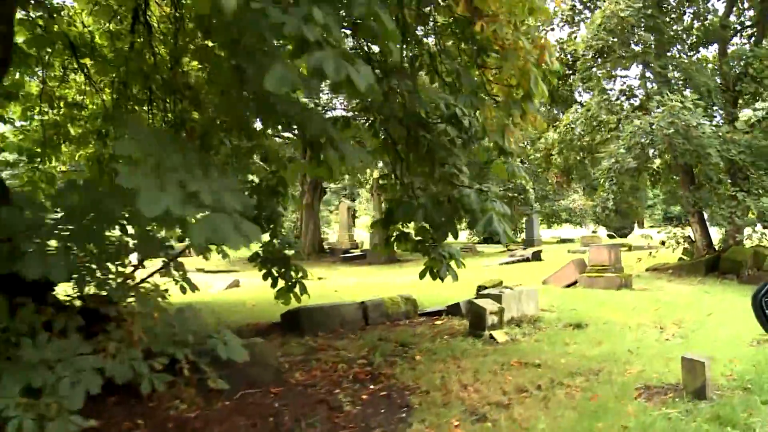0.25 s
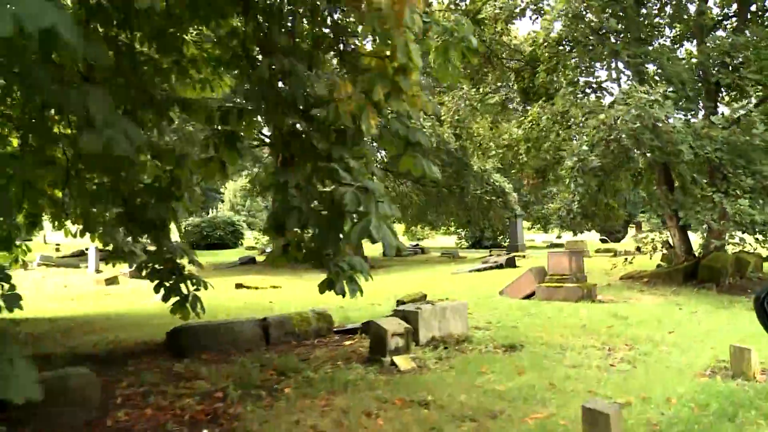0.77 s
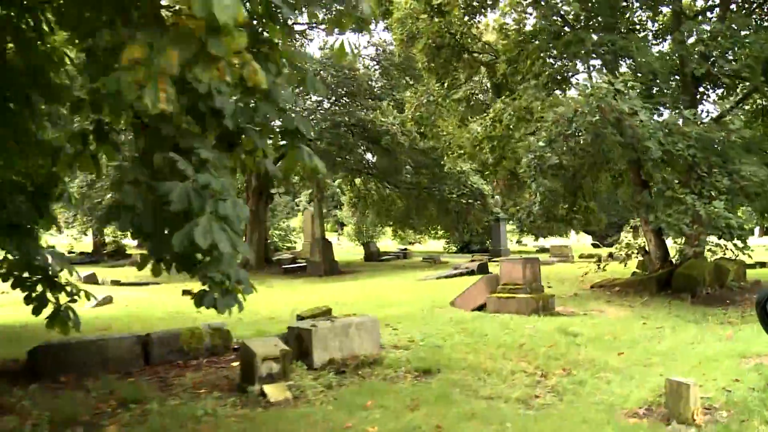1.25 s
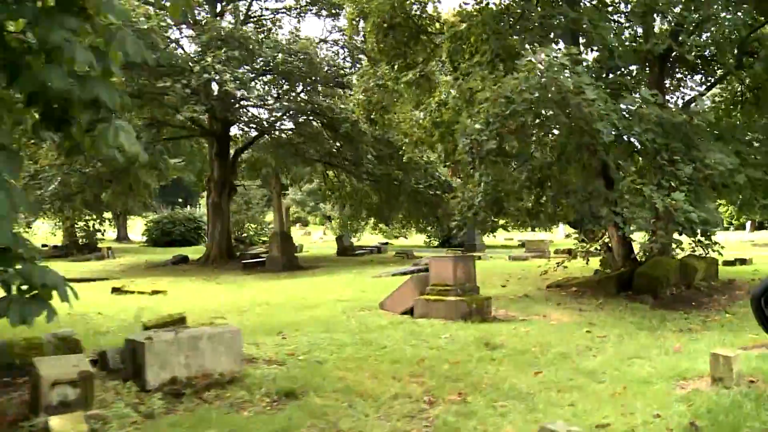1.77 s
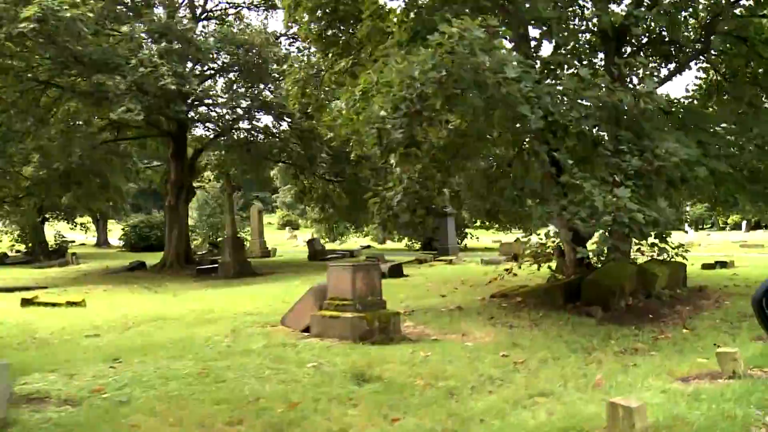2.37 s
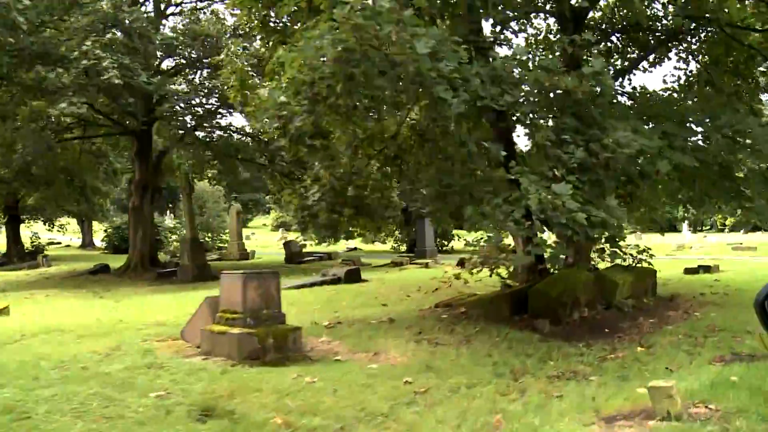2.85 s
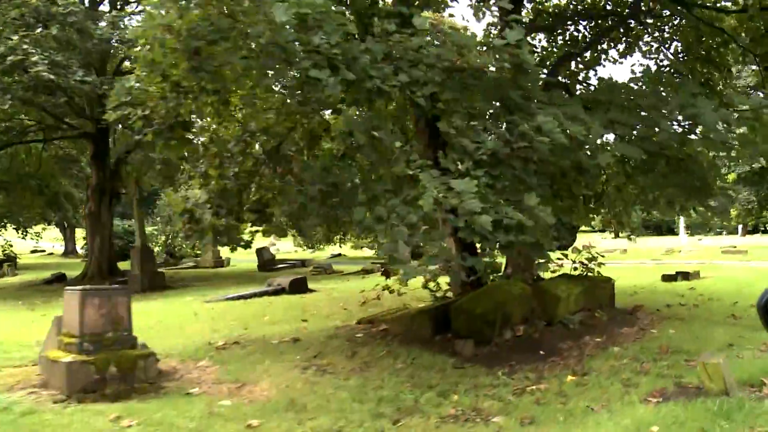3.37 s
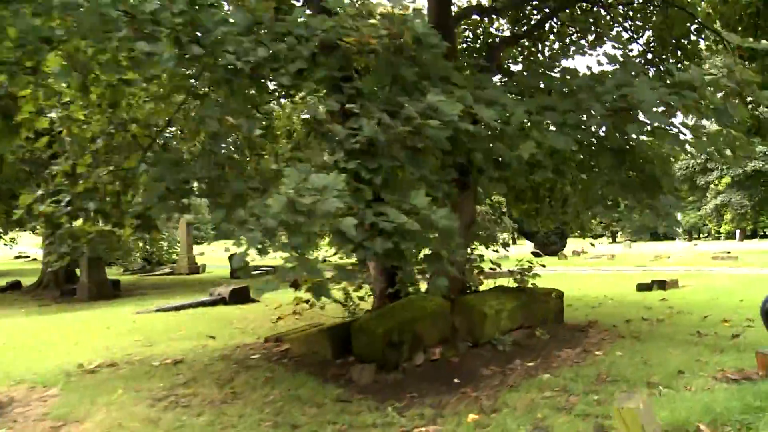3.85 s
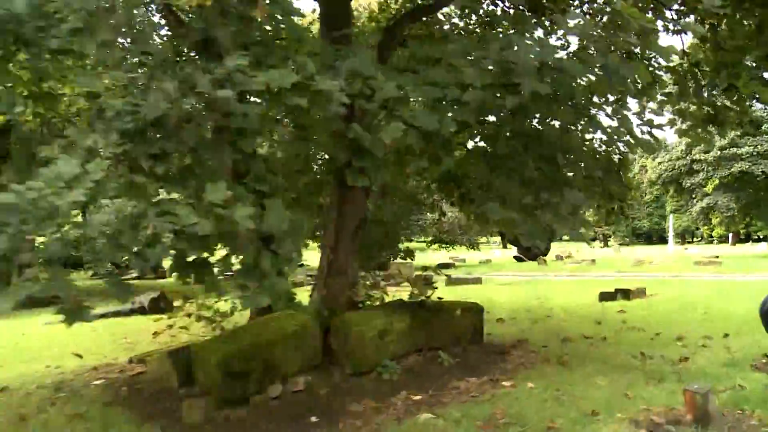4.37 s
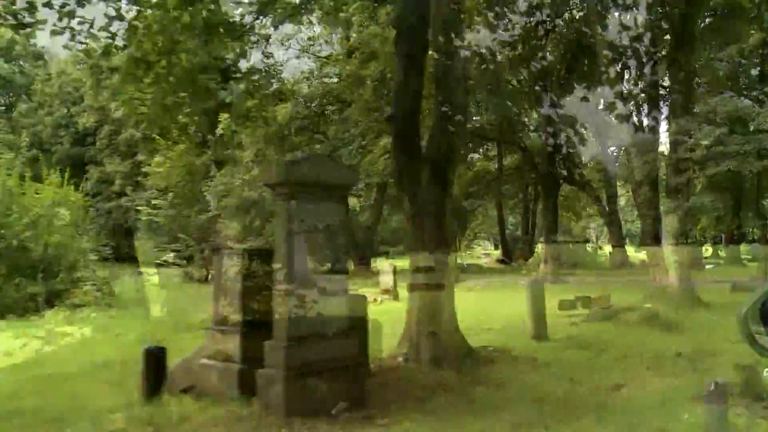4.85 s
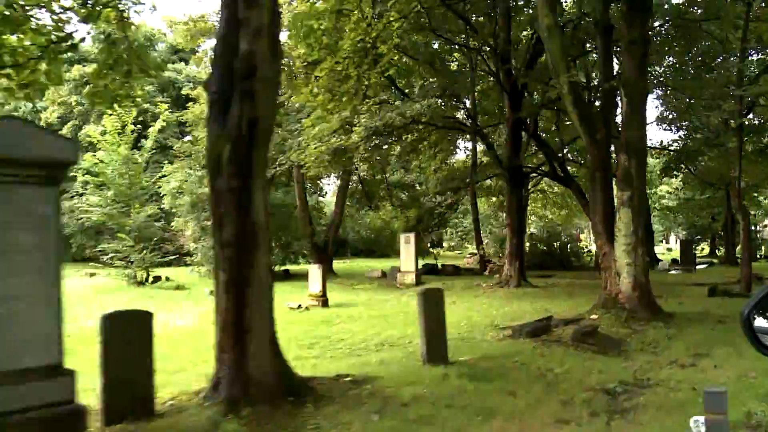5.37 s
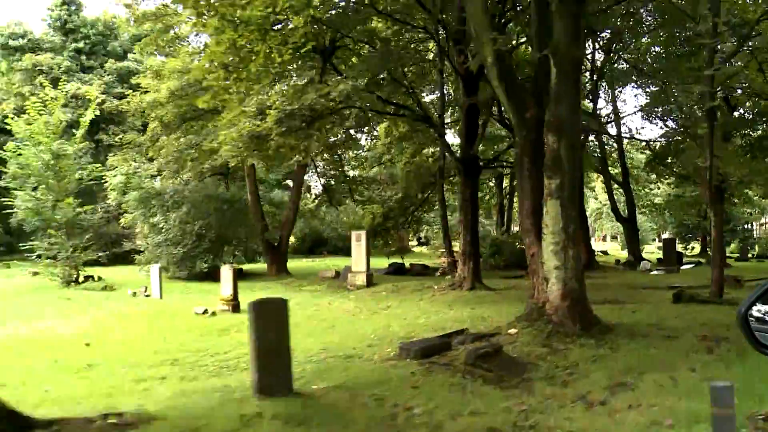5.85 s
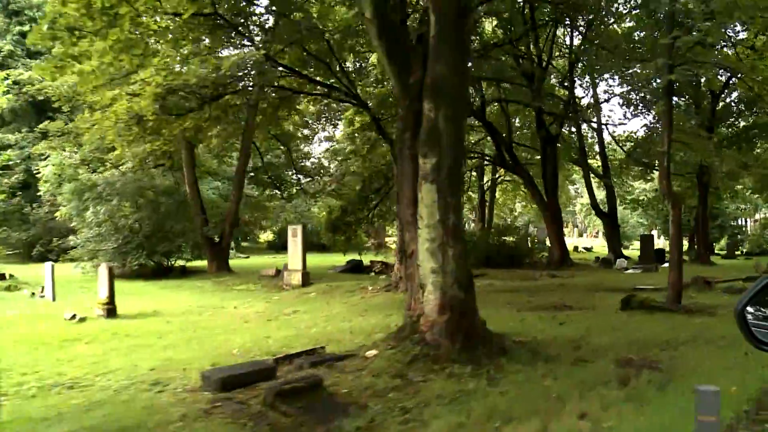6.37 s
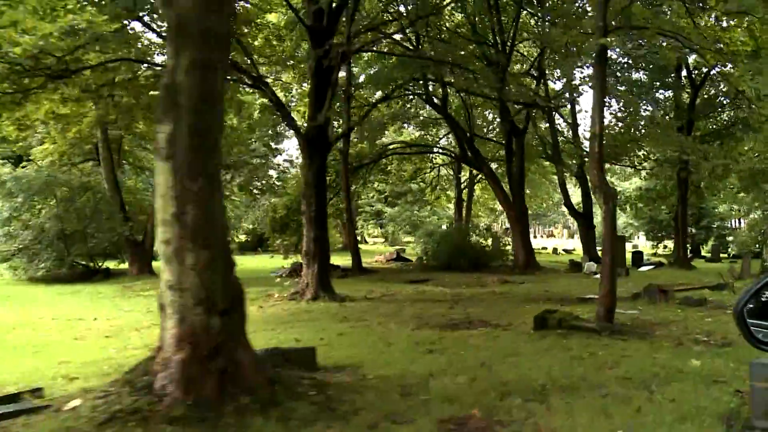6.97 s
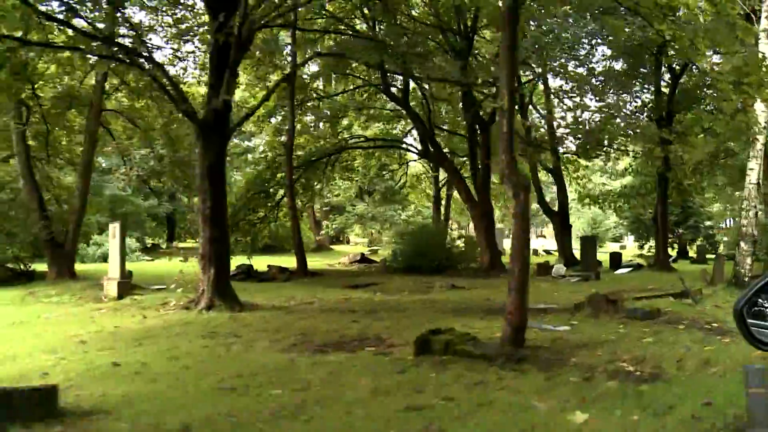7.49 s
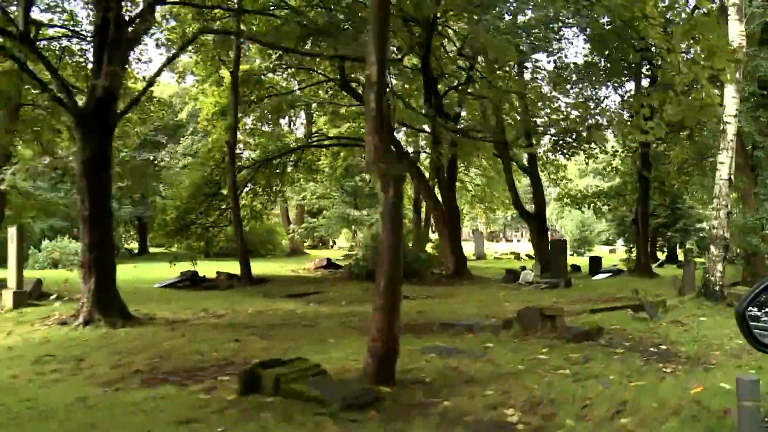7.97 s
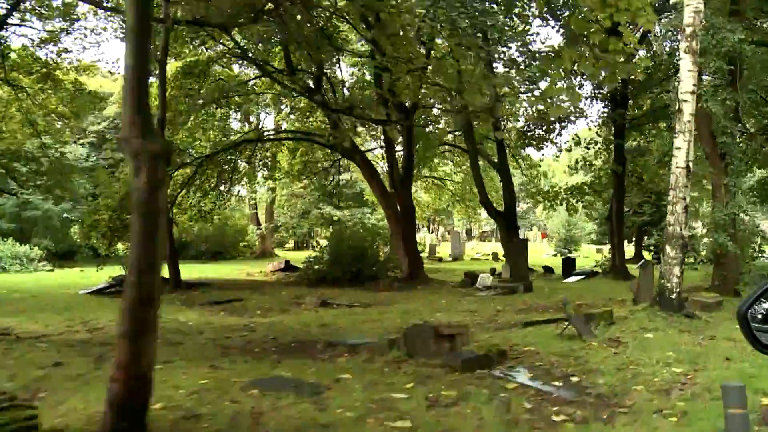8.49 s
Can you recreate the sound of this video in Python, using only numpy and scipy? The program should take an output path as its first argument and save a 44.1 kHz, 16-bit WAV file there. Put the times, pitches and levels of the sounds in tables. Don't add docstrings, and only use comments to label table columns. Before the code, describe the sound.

Low idling engine rumble from a slow car, soft leaf and grit hiss under the tyres, a click midway, then gustier wind buffeting.

```python
import sys
import numpy as np
from scipy import signal
from scipy.fft import rfft, irfft, next_fast_len
from scipy.io import wavfile
from scipy.ndimage import uniform_filter1d

SR = 44100
rng = np.random.default_rng(int(sys.argv[2]) if len(sys.argv) > 2 else 0)


def to_wav(sig):
    pcm = np.clip(np.atleast_2d(sig), -1, 1) * 32767
    pcm = np.round(pcm).astype(np.int16)
    wavfile.write(sys.argv[1], SR, pcm.T)


def makeup_ratio(level_db):
    decades = np.asarray(level_db, float) / 20
    return 10 ** decades


N = 384993
CUT_S = 4.8286


def evened(x):
    return x / np.sqrt(np.mean(x ** 2) + 1e-20)


def columns(table):
    s, *values = np.transpose(table)
    return [np.interp(np.arange(N) / SR, s, v) for v in values]


def noise(points, rings=(), band=None):
    size = next_fast_len(N)
    hz = np.fft.rfftfreq(size, 1 / SR)
    point_hz, point_db = np.transpose(points)
    colour_db = np.interp(np.log(hz + 1), np.log(point_hz + 1), point_db, -120, -120)
    for mid_hz, width_hz, peak_db in rings:
        colour_db += peak_db / (1 + ((hz - mid_hz) / (width_hz / 2)) ** 2)
    spectrum = rfft(rng.standard_normal(size)) * makeup_ratio(colour_db)
    inside = spectrum
    if band is not None:
        inside = spectrum * ((hz > band[0]) & (hz < band[1]))
    return irfft(spectrum, size)[:N] / np.std(irfft(inside, size))


def steadied(x, span_s, share):
    size = max(round(span_s * SR), 1)
    power = uniform_filter1d(uniform_filter1d(x ** 2, size), size)
    return x / evened(np.sqrt(abs(power) + 1e-6)) ** share


def wander(top_hz):
    points = 4096
    step = N / (points - 1)
    hz = np.fft.rfftfreq(points, step / SR)
    slow = irfft(rfft(rng.standard_normal(points)) / (1 + (hz / top_hz) ** 4))
    return np.interp(np.arange(N) / step, np.arange(points), evened(slow))


def bumps(times, heights, half_s):
    out = np.zeros(N)
    for s, height, half in zip(times, heights, half_s * np.ones(len(times))):
        first = max(round((s - 3 * half) * SR), 0)
        at = np.arange(first, min(round((s + 3 * half) * SR), N))
        out[at] += height * np.exp(-((at / SR - s) / half) ** 2)
    return out


def second_pass():
    return np.arange(N) > CUT_S * SR


def law(control_db, base_db, slope, late_db):
    return base_db + slope * control_db + late_db * second_pass()


def patchy(x):
    z = signal.stft(x, nperseg=512)[2]
    field = rng.standard_normal(z.T.shape)
    field = uniform_filter1d(field, size=6, axis=0)
    field = evened(uniform_filter1d(field, size=9, axis=1))
    patch_db = 1
    return signal.istft(z * makeup_ratio(patch_db * field.T), nperseg=512)[1][:N]


# (pitch [Hz], waver [Hz], first-pass level [dB], second-pass level [dB])
HUM_TONES = [(96.8, 1.55, -45.5, -47), (101.8, 1.15, -44.5, -53.5), (128.2, 1.467, -48.5, -53.5),
             (154.4, 1.187, -52, -57), (207.2, 1.53, -50.5, -56.5), (308.3, 1.89, -57, -56)]


def hum():
    out = np.zeros(N)
    late = second_pass()
    for hz, waver_hz, early_db, late_db in HUM_TONES:
        turns = np.cumsum(hz + waver_hz * wander(top_hz=2.38)) / SR
        level_db = np.where(late, late_db, early_db) + 2.0 * wander(top_hz=1.47)
        out += makeup_ratio(level_db) * np.sin(2 * np.pi * turns)
    return np.sqrt(2) * out


# (time [s], level [dB])
GUSTS = [(0, -1), (.95, 0.5), (1.5, 0), (2.3, 1), (2.85, 4.5), (3.25, 2), (4.1, 0), (4.82, 1.5), (4.84, 1),
         (5.3, 0.5), (6.1, 1), (6.9, 1.5), (7.64, 2), (7.72, 10.5), (7.95, 8.5), (8.4, 2.5), (8.73, 5.5)]


def gusts():
    return columns(GUSTS)[0]


# (frequency [Hz], level [dB per Hz])
HEAVE_COLOUR = [(3, -43), (7, -6.5), (13, -1), (22, 1), (30, -5.5), (40, -16)]
BUFFET_COLOUR = [(22, -25), (33, 1), (45, 1), (70, -3), (105, -5), (140, -20.5), (180, -59)]
ROAR_COLOUR = [(90, -28), (125, 0), (170, -1), (250, -3.5), (350, -8), (500, -12.5), (800, -17.5),
               (1100, -24), (1600, -54)]
# (time [s], level [dB])
SURGES = [(.33, 17), (.68, 0), (.92, -10), (1.475, 15), (1.88, -9), (2.02, 1), (2.44, 10), (2.9, 8),
          (3.04, 5), (3.9, -10), (4.28, 12), (4.54, 10), (4.9, 4), (5.15, 15), (5.68, 12), (6.55, 6),
          (6.66, -3), (6.77, 14), (6.917, 14), (7.58, 17), (7.874, 6), (8.55, 2)]
# (time [s], thump peak [dB], thump [Hz], roar puff [dB])
EDDIES = [(1.494, -28, 75, 5), (2.55, -20.5, 72, 5), (2.744, -22.5, 64, 6), (2.892, -17, 55, 5.5),
          (3.662, -20.5, 76, 4), (3.725, -37, 70, 6), (4.275, -28, 73, 4), (4.659, -21.5, 61, -5),
          (5.037, -21, 59.6, -1), (5.197, -24, 69, 2.5), (5.375, -12, 53, -3), (5.547, -37, 80, 8),
          (5.823, -18, 64, 1), (6.05, -17, 45, 5.5), (6.507, -19.5, 65, 4), (6.562, -20, 65, 6),
          (6.75, -15, 38, 1), (6.915, -17, 42, 3), (7.033, -18, 66, -3), (7.224, -22, 66, 1),
          (7.71, -14, 55, 0), (7.749, -5.5, 59, 3), (7.795, -10, 50, 0), (7.865, -17, 35, 2.5),
          (7.91, -18, 50, 3), (7.966, -16, 45, 1), (7.994, -8.5, 58, 1.5), (8.178, -15.5, 73.5, 3.5),
          (8.551, -15, 55.5, 0), (8.677, -17, 58.4, 0.5)]


def wind():
    gust_db = gusts()
    heave_db = law(gust_db, base_db=-40, slope=1.07, late_db=4) + 5 * wander(top_hz=8.2)
    buffet_db = law(gust_db, base_db=-38, slope=1.28, late_db=5) + 2 * wander(top_hz=8.2)
    roar_db = law(gust_db, base_db=-44.5, slope=0.84, late_db=8) + 0.56 * wander(top_hz=8.2)

    heave_db += bumps(*np.transpose(SURGES), half_s=0.025)
    eddy_s, _, _, puff_db = np.transpose(EDDIES)
    roar_db += bumps(eddy_s, puff_db, half_s=0.016)
    buffet_db += bumps(eddy_s, np.full(len(eddy_s), -6.0), half_s=0.03)
    flutter_db = wander(top_hz=24)

    heave = steadied(noise(HEAVE_COLOUR, band=(8, 27)), span_s=0.11, share=1.0)
    buffet = steadied(noise(BUFFET_COLOUR, band=(36, 110)), span_s=0.063, share=0.83)
    roar = steadied(noise(ROAR_COLOUR, band=(135, 450)), span_s=0.045, share=0.23)
    out = makeup_ratio(heave_db) * heave
    out += makeup_ratio(buffet_db + 1.0 * flutter_db) * buffet
    out += makeup_ratio(roar_db + 0.95 * flutter_db) * roar
    return out


def thumps():
    out = np.zeros(N)
    half = SR // 20
    for s, db, hz, _ in EDDIES:
        turns = np.arange(-half, half) / SR * hz
        pulse = np.exp(-(turns / 0.66) ** 2) * np.cos(2 * np.pi * turns)
        out[round(s * SR) - half:][:2 * half] -= makeup_ratio(db) * pulse
    return out


# (time [s], level [dB])
LITTER_DEPTH = [(0, 3.5), (.5, 4), (1.5, 2.5), (2.2, 0.5), (3.3, -.5), (4, 1), (4.82, 1), (4.84, -0.5),
                (5.3, 1), (6.1, 2), (6.7, 1), (7, 5), (7.6, 5.5), (8.05, 8), (8.45, 5), (8.73, 7)]


def litter():
    return columns(LITTER_DEPTH)[0]


def crackle():
    pops_per_s, spread_db, kinds = 300, 2.5, 6
    size = makeup_ratio(spread_db * np.minimum(rng.exponential(1, N), 4))
    size *= rng.random(N) < pops_per_s / SR
    kind = rng.integers(0, kinds, N)
    t = np.arange(200) / SR
    out = np.zeros(N)
    for k, hz in enumerate(np.geomspace(2200, 4300, kinds)):
        pop = t * hz * np.exp(-t * hz / 1.2) * np.sin(2 * np.pi * hz * t)
        out += signal.oaconvolve(size * (kind == k), pop)[:N]
    return makeup_ratio(-75.5 + 2 * litter()) * evened(out)


# (time [s], peak level [dB], pitch [Hz], length [cycles])
TWIG_SNAPS = [(.308, -36.5, 2800, 4), (1.2775, -42, 3500, 3), (1.2785, -31, 2700, 4),
              (1.4144, -36, 2210, 4), (1.5504, -45, 2320, 4), (1.6824, -45, 2050, 4),
              (2.5334, -46, 2400, 4), (6.5344, -43, 2480, 4), (6.5544, -41, 2030, 4),
              (7.0344, -44, 2030, 4), (8.0144, -33, 2410, 4), (8.0774, -36, 2370, 4)]
GRIT_TICKS = [(0.3644, -55, 9550, 8), (1.3174, -52, 10900, 8), (1.492, -48, 10500, 8),
              (1.6921, -51, 14500, 8), (4.7386, -49, 10900, 8), (5.3884, -54, 13500, 8),
              (6.2382, -46, 10200, 8), (6.2564, -46, 13500, 8), (6.554, -48, 6500, 8),
              (6.8544, -50, 10700, 8), (6.9094, -49, 11200, 8), (7.1681, -40, 13300, 8)]


def snaps():
    out = np.zeros(N)
    t = np.arange(300) / SR
    for s, db, hz, cycles in [*TWIG_SNAPS, *GRIT_TICKS]:
        progress = t * hz / cycles * 3
        shape = progress * np.exp(1 - progress)
        out[round(s * SR):][:300] += makeup_ratio(db) * shape * np.sin(2 * np.pi * hz * t)
    return out


# (frequency [Hz], level [dB per Hz])
HISS_COLOUR = [(1760, -19), (3000, -16), (3260, -1), (4640, -9), (5200, -4.5), (5710, -12.5), (6460, -4),
               (6780, -6.5), (7310, -5), (8010, -15.5), (8600, -15.5), (11200, -39), (18900, -120)]
RUSTLE_COLOUR = [(4470, -39), (7600, -14), (8190, -8), (10500, 1.5), (12100, -6), (13000, -2.5),
                 (14800, -3), (15700, -3)]
# (time [s],
# rustle [dB], hiss [dB], half length [s])
LEAF_DRIFTS = [(.004, 7, 6, .006), (0.254, 3.5, 1.5, .03), (.374, 2, -1.5, .015), (.703, 2, 0, .025),
               (1.309, 4, 0, .02), (1.493, 5, -1, .02), (1.713, 6, 1.5, .035), (1.936, 2, -1, .045),
               (2.253, 2.5, 0, .02), (2.544, 6.5, 1.5, .018), (2.961, 3, 1, .05), (4.124, 3, 0, .03),
               (4.735, 6, 5, .015), (5.47, 4, 2, .05), (5.74, 6, 2, .1), (6.24, 4, 5.5, .025),
               (6.423, 3, 5, .03), (6.555, 1, 5, .013), (6.85, 3, 6, .022), (7.183, 2, 4.5, 0.05),
               (7.422, 1, 1.5, .035), (7.8, 2.5, 1, .06), (8.051, 1, 2, .04), (8.52, 1.5, 3, .03),
               (8.728, 3, 12, .005)]


def tyres():
    s, leaves_db, grit_db, half_s = np.transpose(LEAF_DRIFTS)
    litter_db = litter()
    hiss_db = law(litter_db, base_db=-67.5, slope=0.85, late_db=-1.35) + bumps(s, grit_db, half_s)
    rustle_db = law(litter_db, base_db=-70, slope=0.97, late_db=4.55) + bumps(s, leaves_db, half_s)
    flicker_db = wander(top_hz=25)
    out = makeup_ratio(hiss_db + 0.51 * flicker_db) * noise(HISS_COLOUR, band=(3800, 7800))
    out += makeup_ratio(rustle_db + 0.8 * flicker_db) * noise(RUSTLE_COLOUR, band=(8200, 15600))
    return patchy(out)


# (time [s], firings [per s], throb level [dB])
ENGINE_RUN = [(0, 31.8, -33.5), (.8, 31.7, -33), (1.5, 30.8, -36), (2.4, 30.3, -34.5), (2.8, 30.8, -34),
              (3.4, 29.8, -36.5), (4.2, 31.5, -35), (4.82, 31.3, -35.5), (5.4, 31, -41), (6.2, 31.2, -31),
              (6.9, 31.7, -36.5), (7.6, 31, -27.5), (8.73, 31, -31)]
# (multiple of the firing rate, level [dB])
FIRING_ORDERS = [
    (1, 2.5),
    (2, -9),
    (3, -14),
    (4, -17),
]
# (frequency [Hz], level [dB per Hz])
BAY_COLOUR = [(190, -28), (330, -2.5), (356, -2), (379, -20), (449, -5), (562, -2), (618, -5.5), (703, -4),
              (781, -3), (977, -5), (1160, -7.5), (1280, -4.5), (2100, -11), (2360, -9), (2700, -14),
              (3000, -21), (4200, -37.5), (5460, -37.5), (9240, -120)]
# (frequency [Hz], width [Hz], level [dB])
METAL_RINGS = [(539, 18, 3.5), (584, 21, 5.5), (996, 57, 3.5), (1150, 82, -2.5), (1310, 91, -1),
               (1512, 34, 5), (1620, 42, 3), (1762, 53, 4)]


def engine():
    rate, throb_db = columns(ENGINE_RUN)
    turns = np.cumsum(rate + 0.28 * wander(top_hz=3.55)) / SR
    throb = np.zeros(N)
    for order, db in FIRING_ORDERS:
        level = makeup_ratio(db + 1.3 * wander(top_hz=1.6))
        throb += level * np.cos(2 * np.pi * (order * turns + rng.random()))

    after = turns % 1
    knock = (1 - np.exp(-after / 0.079)) * np.exp(-after / 0.14)
    knock *= makeup_ratio(0.63 * (turns % 2 > 1))
    gate = evened(1 + 0.64 * knock)
    clatter = gate * noise(BAY_COLOUR, METAL_RINGS, band=(1100, 2900))
    clatter_db = law(litter(), base_db=-47.5, slope=0.31, late_db=0.82)
    clatter_db += 0.14 * gusts() + 0.6 * wander(top_hz=6.5)
    return np.sqrt(2) * makeup_ratio(throb_db) * throb + makeup_ratio(clatter_db) * clatter


def scene_change():
    jump, relax_s = -0.142, 0.008
    t = np.arange(N) / SR - CUT_S
    return jump / 2 * np.sign(t) * np.exp(-abs(t) / relax_s)


def scene():
    air = hum() + wind() + thumps() + crackle() + snaps() + tyres() + engine()
    treble_limit = signal.firwin(255, 15730, fs=SR)
    return (signal.oaconvolve(air, treble_limit, "same") + scene_change())[None]


def top_cut(x):
    return signal.sosfilt(signal.butter(12, 16530, fs=SR, output="sos"), x)


def record(dry):
    return top_cut(dry)


dry = scene()
out = record(dry)
to_wav(out)
```